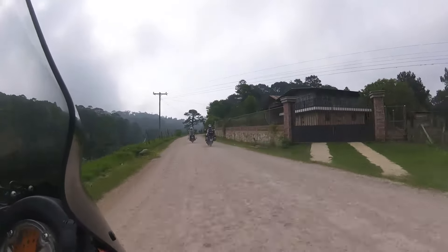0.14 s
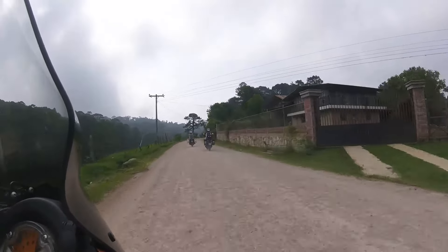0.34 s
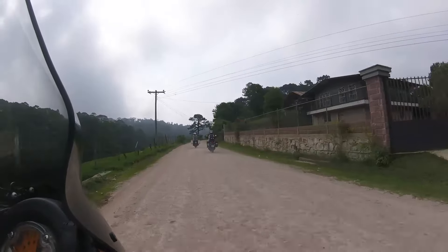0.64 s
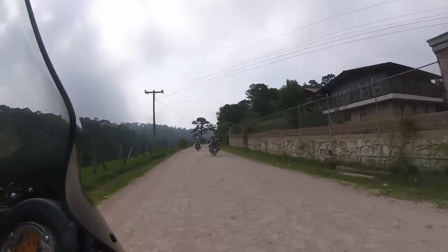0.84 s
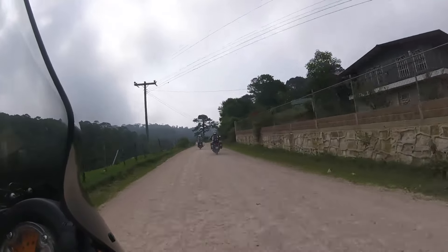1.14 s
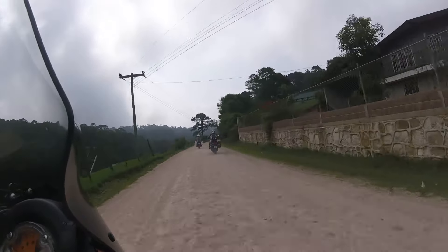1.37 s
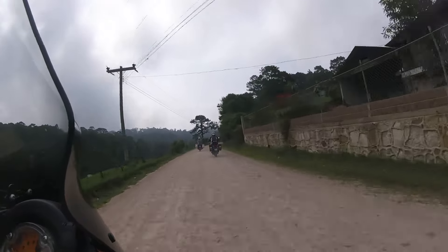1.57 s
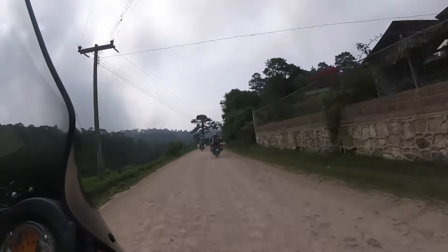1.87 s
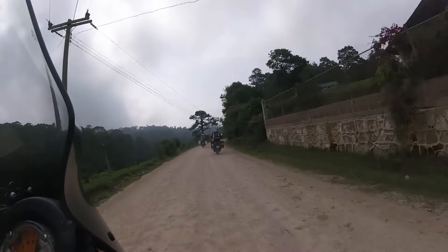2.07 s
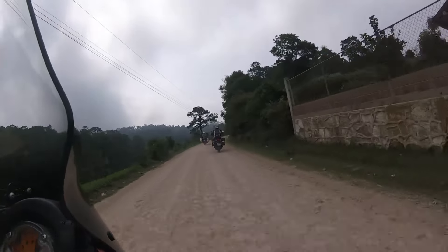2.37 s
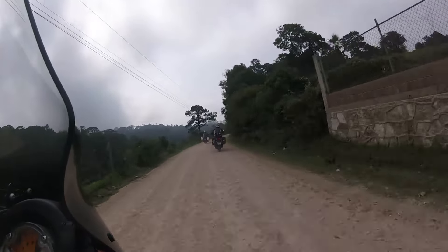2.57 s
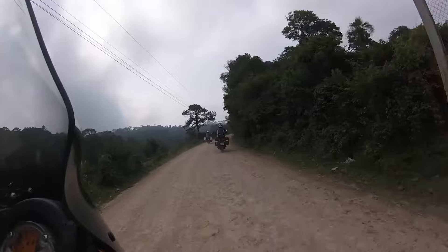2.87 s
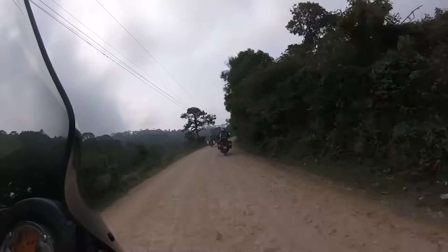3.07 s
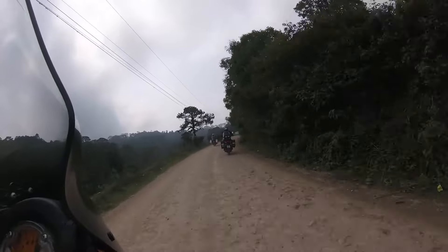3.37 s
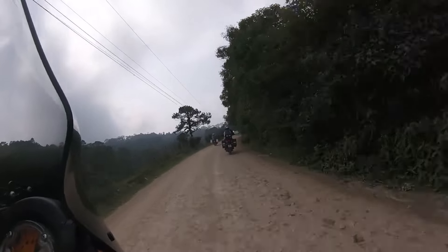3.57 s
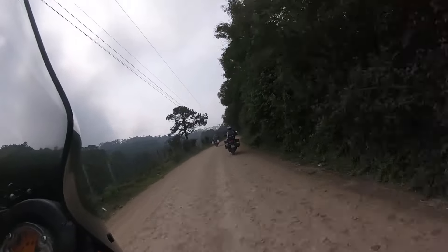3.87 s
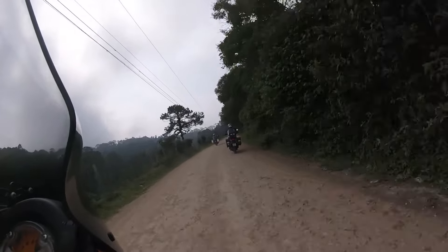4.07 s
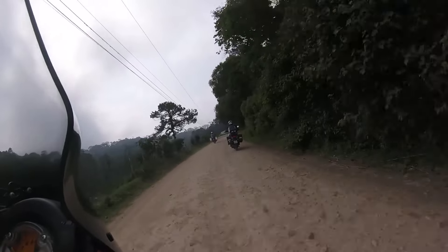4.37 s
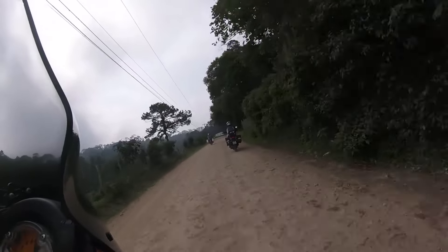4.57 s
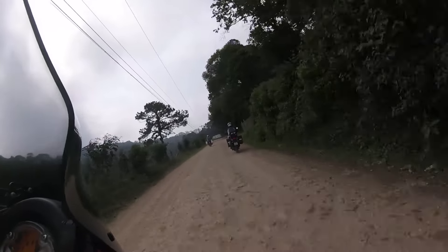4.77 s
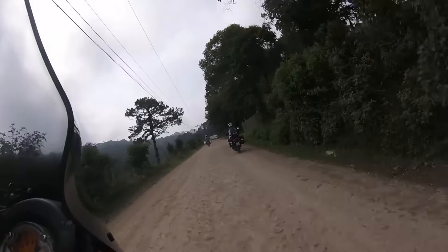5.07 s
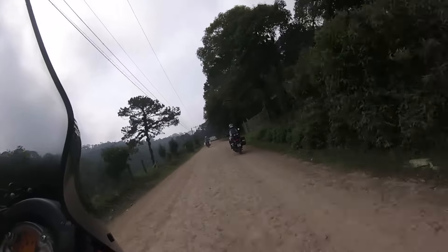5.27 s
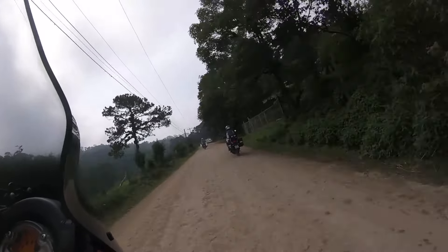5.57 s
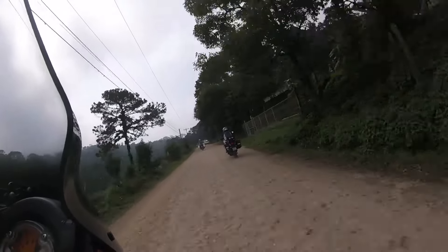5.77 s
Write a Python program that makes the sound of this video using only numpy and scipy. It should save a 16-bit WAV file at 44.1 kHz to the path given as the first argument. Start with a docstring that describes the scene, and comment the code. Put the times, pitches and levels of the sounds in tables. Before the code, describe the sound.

A motorcycle drones steadily along a dirt road, its loose mount clattering dully over low road rumble, with sharp gravel ticks.

```python
"""On a dirt road, riding on a motorcycle: two close microphone ports in a camera case behind the windscreen.
The engine drones in orders of its cycle rate, easing off and pulling again; noise gives road rumble and hiss.
Gusts whistle as chirping edge tones and the gears add a faint, fuzzy mesh tone.
Knocks ring the case in a dull clatter, gravel ticks on the bike, and short faded sines boom in the fairing."""
import sys
import numpy as np
from scipy import signal
from scipy.fft import rfft, irfft
from scipy.io import wavfile
from scipy.ndimage import uniform_filter1d

SR = 44100
rng = np.random.default_rng(int(sys.argv[2]) if len(sys.argv) > 2 else 0)


def unload_audio(sound):
    """Save the sound as a 16-bit wav file, at the path given as the first command line argument."""
    columns = np.transpose(np.atleast_2d(sound))
    # keep every value between -1 and 1, then stretch to whole-number steps
    steps = np.round(np.clip(columns, -1, 1) * 32767)
    wavfile.write(sys.argv[1], SR, steps.astype(np.int16))


N = 261513
TIME = np.arange(N) / SR  # s


def amp(db):
    """Decibels to gain."""
    return 10 ** (np.asarray(db) / 20)


def unit(x):
    """Scales to rms 1."""
    return x / np.sqrt(np.mean(x ** 2) + 1e-20)


def curve(rows, t=TIME):
    """Reads (time, value) rows at the times t, with straight lines between."""
    return np.interp(t, *np.transpose(rows))


def colour(points, hz):
    """Gain of a (frequency, level) table on a log-frequency axis."""
    f, db = np.transpose(points)
    return amp(np.interp(np.log(hz + 1), np.log(f + 1), db))


def wander(rate):
    """Slow random drift of rms 1, mostly below rate in Hz."""
    hz = np.fft.rfftfreq(N, 1 / SR)
    low_pass = 1 / np.sqrt(1 + (hz / rate) ** 6)
    return unit(irfft(rfft(rng.standard_normal(N)) * low_pass, N))


# Difference between the two microphone ports, against their common noise:
# (frequency [Hz], level [dB])
PORT_DIFFERENCE = [(25, -17), (60, -23.5), (130, -22), (260, -27.5), (500, -16), (1000, -12.5),
                   (2000, -21.5), (4500, -37.5), (7000, -40), (9000, -12.5), (12000, 4)]


def noise(points):
    """Coloured noise reaching two close ports: a shared part, and a part of opposite sign in each."""
    hz = np.fft.rfftfreq(N, 1 / SR)
    mid, side = rfft(rng.standard_normal((2, N))) * colour(points, hz)
    side = side * colour(PORT_DIFFERENCE, hz)
    return unit(irfft(np.array([mid + side, mid - side]), N))


def ring(points, size=2048):
    """Causal (minimum-phase) response of a body with this spectrum, peak 1."""
    log_gain = np.log(colour(points, abs(np.fft.fftfreq(size, 1 / SR))))
    spectrum = np.exp(np.conj(signal.hilbert(log_gain)))
    response = np.fft.ifft(spectrum).real[:size // 2]
    return response / abs(response).max()


def add(mix, s, sound):
    """Mixes a sound in at time s."""
    part = mix[max(round(s * SR), 0):][:len(sound)]
    part += sound[:len(part)]


# Engine speed: (time [s], four-stroke cycle rate [cycles/s])
ENGINE_SPEED = [(0.0, 32.64), (0.1, 34.22), (0.5, 33.38), (0.66, 34.88), (0.8, 34.1), (1.4, 34.1),
                (2.0, 35.61), (2.26, 35.12), (2.34, 32.4), (2.5, 33.41), (3.0, 31.96), (3.13, 33.78),
                (3.3, 32.61), (3.8, 33.55), (4.5, 34.08), (5.25, 34.77), (5.93, 36.95)]


def cycles():
    """Running count of engine cycles, the integral of speed, set back an eighth of a cycle."""
    return np.cumsum(curve(ENGINE_SPEED)) / SR - 1 / 8


def stroke():
    """Swings from -1 to 1 once a cycle, highest a tenth of a cycle in."""
    return np.cos(2 * np.pi * (cycles() - .1))


# Throttle: (time [s], opening [0-1])
THROTTLE_OPENING = [(0, 0.59), (.58, 0.44), (.82, 0.95), (2.1, 0.91), (2.32, 0.57), (3.12, 0.71),
                    (3.33, 0.96), (4.9, 0.85), (5.93, 0.95)]
# Strength of the drone: (time [s], relative level [dB])
DRONE_LEVEL = [(0, -19.5), (.12, -15.5), (.2, -17), (.8, -15.5), (1.1, -15.5), (2.1, -16), (2.35, -20),
               (2.55, -17), (3, -20), (3.2, -16.5), (4, -17), (4.35, -14), (4.68, -17), (5.05, -14.5),
               (5.22, -17.5), (5.3, -16.5), (5.8, -16)]
# Engine orders:
# (multiple of the cycle rate, level with throttle shut [relative dB], level with it open [relative dB])
ENGINE_ORDERS = [(2, -19, -12), (3, -5.5, -13), (4, 5, 2), (5, -21, -5), (6, -24.5, -3), (7, -10, -18),
                 (8, -27, -15), (9, -41, -41.5), (10, -37.5, -19.5), (12, -48.5, -52)]


def engine(uneven=0.15, rough=.17, throb_db=0.7, lope=0.083):
    """Uneven burning blurs the orders; throttle sets their balance, and easing off lets the drone lope."""
    boom_db, boom_fall_db, boom_speed = 2.0, 3.5, 33.3  # dB, dB per cycle/s, cycles/s
    turns, opening = cycles(), np.clip(curve(THROTTLE_OPENING), 0, 1)
    pull = np.interp(opening, [.6, .82], [0, 1])
    pipe_lag, pipe_spread = .5, .87 + .48 * pull  # radians
    throb = wander(9)
    drone = np.zeros(N)
    for order, shut_db, open_db in ENGINE_ORDERS:
        k = round(order)
        above_firing = k - 4  # four firings a cycle
        blur = uneven if k == 4 else rough
        burn = 1 + blur * (wander(14) + 1j * wander(14))
        # the exhaust holds higher orders back longer
        delay = above_firing * (pipe_lag + pipe_spread * max(above_firing, 0))
        tone = burn * np.exp(1j * (2 * np.pi * k * turns - delay))
        if k == 2:  # the crank order booms, and fades as the revs rise past its resonance
            revs_past = np.maximum(curve(ENGINE_SPEED) - boom_speed, 0)
            tone = tone * amp(boom_db - boom_fall_db * revs_past)
        order_gain = amp(shut_db + opening * (open_db - shut_db))
        drone -= order_gain * tone.real
    loping = 1 + lope * (1 - pull) * stroke()
    return amp(curve(DRONE_LEVEL) + throb_db * throb) * drone * loping


def shake(times, revs_db=1.5, revs_range=1.7, load_db=1.0):
    """Shaking in dB: it grows with engine speed, levelling off, and a little with load."""
    cruise = 34  # cycles/s
    from_revs = revs_db * (1 - np.exp((cruise - curve(ENGINE_SPEED, times)) / revs_range))
    return from_revs + load_db * (curve(THROTTLE_OPENING, times) - 1)


# Colour of road and wind rumble: (frequency [Hz], relative density [dB])
RUMBLE_COLOUR = [(10, -20), (25, -6), (55, -2), (95, -9), (140, -4), (175, -8), (235, 0), (310, -13.5),
                 (540, -19), (690, -27), (880, -26), (1200, -39), (1800, -48), (6000, -110)]
# Roughness of the road, weighted before use: (time [s], relative level [dB])
ROAD_BUMPS = [(0, 2.5), (1.4, -9.5), (1.6, 2.5), (1.9, 9), (2.3, 7), (2.95, 9.5), (3.15, -2.5), (3.6, 6),
              (4.4, 2.5), (5, -9.5), (5.93, -35.5)]
# Colour of tyre and air hiss through the case: (frequency [Hz], relative density [dB])
HISS_COLOUR = [(700, -10.5), (1500, 7.5), (2300, 9.5), (2900, 3), (3600, -2.5), (4400, -7), (5200, 5.5),
               (6200, 6.5), (6500, 10), (6900, 2.5), (8000, -9), (9500, -14.5), (11300, -37),
               (14000, -63.5)]
# Strength of the hiss: (time [s], relative level [dB])
HISS_STRENGTH = [(0, -58), (1.8, -56), (2.8, -58.5), (4.2, -55), (4.9, -56.5), (5.93, -58.5)]


def road(rumble_db=-25.0, load_db=3, swell_db=2.8, hiss_db=3.5, chop=0.055, pulse=0.35):
    """Rumble pulses with the engine and swells with load and bumps, most in its deep part; firings chop hiss."""
    bump_share, thud_share, shake_share = .12, .26, .3
    spray_s, spray_width_s, spray_db = 1.444, 0.048, 7
    swell = bump_share * curve(ROAD_BUMPS) + load_db * (curve(THROTTLE_OPENING) - 1)
    swell = swell + shake_share * shake(TIME) + swell_db * wander(48)
    rumble = amp(rumble_db + swell) * (1 + pulse * stroke()) * noise(RUMBLE_COLOUR)
    low_pass = signal.butter(2, 100, fs=SR, output="sos")
    deep = signal.sosfiltfilt(low_pass, rumble)
    rumble = rumble - deep + deep * amp(thud_share * curve(ROAD_BUMPS))
    firing = np.cos(8 * np.pi * cycles())
    # a patch of loose sand lifts the hiss
    spray = spray_db * np.exp(-((TIME - spray_s) / spray_width_s) ** 2)
    hiss_gain = amp(curve(HISS_STRENGTH) + spray + hiss_db + wander(30))
    hiss = hiss_gain * (1 + chop * firing) * noise(HISS_COLOUR)
    return rumble + hiss


# Whistling gusts: (start [s], length [s], pitch at the start [Hz], in the middle [Hz],
# at the end [Hz], relative level [dB])
WHISTLING_GUSTS = [(0, 0.049, 3125, 3254, 3015, -58.5), (0.055, .04, 3013, 3100, 2957, -60),
                   (0.113, .035, 2548, 2500, 2820, -54.5), (.172, .025, 2850, 3100, 3270, -59),
                   (.213, 0.06, 3663, 3340, 3700, -54.5), (.265, 0.078, 3476, 3297, 3452, -57),
                   (0.333, .058, 2923, 3180, 3354, -55), (0.403, .035, 3000, 3050, 3280, -57),
                   (0.574, 0.038, 3282, 3495, 3090, -56), (0.624, .04, 3060, 3138, 3148, -55.5),
                   (0.662, 0.11, 3700, 3348, 3400, -56), (0.785, .078, 2955, 3300, 3670, -54.5),
                   (0.852, .048, 3400, 2950, 2437, -53.5), (.938, .065, 3165, 3612, 3520, -54),
                   (.995, 0.068, 3456, 3190, 2952, -53), (1.054, .055, 3230, 3036, 3377, -56),
                   (1.177, .078, 3245, 3076, 3246, -53), (1.303, .027, 2650, 2397, 2185, -51.5),
                   (1.379, .115, 2900, 3468, 3550, -54.5), (1.565, 0.067, 3997, 4043, 3800, -58),
                   (1.618, .075, 3750, 4000, 4300, -55), (1.748, .052, 4180, 3760, 3763, -58),
                   (1.8, .068, 3733, 4020, 3420, -56.5), (1.918, 0.028, 3650, 3846, 4114, -56.5),
                   (2.012, .04, 4100, 3780, 4160, -56.5), (2.05, .08, 3850, 3900, 3950, -55.5),
                   (2.177, 0.071, 3845, 3650, 3590, -54.5), (2.23, 0.11, 3850, 3724, 3950, -54.5),
                   (2.321, .075, 3650, 3600, 3437, -55.5), (2.418, 0.028, 2887, 2600, 2487, -55),
                   (2.471, .085, 2816, 3025, 3600, -57), (2.567, .082, 3320, 3250, 3550, -56.5),
                   (2.705, 0.024, 3260, 3000, 2683, -55), (2.788, 0.07, 2845, 2796, 2817, -62),
                   (2.893, 0.024, 2764, 2650, 2500, -57), (2.956, .065, 2738, 2900, 2758, -62),
                   (3.073, .04, 2700, 2650, 2520, -59), (4.138, 0.046, 2547, 2786, 3303, -59.5),
                   (4.29, .08, 3146, 3300, 3344, -54.5), (4.391, 0.038, 3150, 2850, 2513, -59),
                   (4.455, .035, 3036, 2750, 2470, -59), (4.493, 0.04, 2390, 2750, 2953, -56.5),
                   (4.755, .045, 2836, 3050, 3393, -54), (4.905, .05, 3006, 3350, 3455, -57.5),
                   (4.963, .057, 3150, 3286, 3480, -56.5), (5.242, 0.062, 3036, 3247, 3260, -57.5),
                   (5.295, .03, 3200, 3450, 3350, -64), (5.456, 0.052, 2840, 3037, 3404, -59),
                   (5.767, 0.041, 3225, 3300, 3200, -61)]


def whistle(level_db=-0.7, waver_db=2.5, lull_swell_db=3):
    """An edge tone whose pitch swoops with the air speed of each short gust and trembles with turbulence."""
    lull_hz, lull_db = 2650, -75  # between gusts; the level is relative
    pitch = np.full(N, float(lull_hz))
    level = amp(lull_db + lull_swell_db * wander(8))
    for start, length, *path_hz, db in WHISTLING_GUSTS:
        gust = (TIME >= start) & (TIME < start + length)
        along = (TIME[gust] - start) / length
        swell = signal.windows.tukey(len(along), .3)
        pitch[gust] = np.polyval(np.polyfit([0, .5, 1], path_hz, 2), along)
        level[gust] += swell * (amp(db) - level[gust])
    pitch = uniform_filter1d(pitch, round(.004 * SR))  # pitch steps become short glides
    # strong, fast air locks into a purer tone; weak gusts only rasp
    breathy = np.interp(pitch, [2900, 3700], [.8, .45])
    breathy = breathy * np.interp(level, amp([-58, -53]), [1, .5])
    flutter = 90 * wander(75)  # Hz
    turn = np.exp(2j * np.pi * np.cumsum(pitch + flutter) / SR)
    rasp = 1 + breathy * (wander(340) + 1j * wander(340))
    tone = (turn * rasp).real / np.sqrt(1 + 2 * breathy ** 2)
    return amp(level_db) * level * unit(tone * amp(waver_db * wander(82)))


def gears(level_db=-62, teeth=70.3, blur=.35):
    """A faint, fuzzy mesh tone tied to the road speed, which follows the engine smoothly."""
    road_speed = uniform_filter1d(curve(ENGINE_SPEED), SR // 2)
    turn = np.exp(2j * np.pi * teeth * np.cumsum(road_speed) / SR)  # teeth meeting per engine cycle
    # (time [s], relative level [dB])
    level = curve([(0, -4.5), (2.2, -6), (2.8, -4), (3.4, -5.5), (4.3, -3), (5.93, -11.5)])
    fuzz = 1 + blur * (wander(35) + 1j * wander(35))
    return amp(level_db + level) * unit((turn * fuzz).real)


# Clear knocks of the camera mount: (time [s], relative level [dB])
MOUNT_KNOCKS = [(0.0532, -23.5), (0.0625, -23.5), (0.0925, -18.5), (0.1511, -16.5), (0.159, -25),
                (0.2099, -21), (0.2978, -18.0), (0.4178, -21.5), (0.4318, -25), (0.4776, -22),
                (0.506, -19.5), (0.566, -18), (0.669, -20), (0.697, -22), (0.711, -19.5), (0.7691, -20),
                (0.798, -17), (0.8574, -19), (0.9507, -26), (0.9747, -21.5), (1.0033, -19), (1.04, -25),
                (1.0613, -18), (1.0916, -20), (1.1503, -18), (1.1863, -21.0), (1.216, -21.5), (1.2389, -22),
                (1.327, -18.5), (1.4144, -19.5), (1.479, -19), (1.5018, -16.5), (1.5596, -20.5),
                (1.6027, -21), (1.6369, -24.5), (1.646, -17.5), (1.7037, -15.5), (1.7329, -20.5),
                (1.796, -22), (1.832, -19.5), (1.859, -19.5), (1.904, -19), (1.9162, -28), (1.9601, -22),
                (2.0173, -18), (2.049, -18.5), (2.0722, -19), (2.1009, -19), (2.1296, -20.5),
                (2.1629, -20.0), (2.187, -18), (2.2425, -18), (2.2987, -21), (2.329, -23.5), (2.3825, -22),
                (2.5116, -19.5), (2.541, -21), (2.5647, -22), (2.5945, -21.0), (2.7468, -20.5),
                (2.857, -24), (2.869, -26), (3.0257, -26.5), (3.1829, -19.5), (3.1991, -25.5),
                (3.2881, -22.5), (3.3574, -21), (3.3658, -22), (3.577, -21.5), (3.6981, -18), (3.7731, -22),
                (3.8182, -24.5), (3.8484, -19.5), (3.9364, -18.5), (4.0106, -19.5), (4.0548, -22),
                (4.1162, -24), (4.129, -22.5), (4.2696, -21), (4.2765, -20.5), (4.321, -16.5), (4.335, -19),
                (4.351, -20), (4.4238, -17.5), (4.482, -23), (4.5278, -21), (4.557, -17), (4.5867, -21.5),
                (4.6154, -24.5), (4.6721, -22.5), (4.7024, -20), (4.717, -22), (4.732, -20), (4.7659, -23),
                (4.775, -17), (4.8183, -22), (4.8489, -19.5), (4.878, -21), (4.9223, -19.5), (4.9576, -22),
                (4.981, -22), (4.9942, -20), (5.0137, -20), (5.023, -17.5), (5.0587, -25), (5.0719, -23),
                (5.0817, -20), (5.0942, -20.5), (5.1082, -14.5), (5.145, -19), (5.1675, -21),
                (5.1817, -19.5), (5.1965, -20), (5.2542, -18.5), (5.2828, -20.5), (5.3106, -19.5),
                (5.3386, -26), (5.3685, -17.5), (5.4017, -21.5), (5.4247, -15.5), (5.4523, -22.5),
                (5.509, -23), (5.5376, -19), (5.5949, -17.5), (5.6073, -24), (5.6213, -24), (5.654, -20.5),
                (5.6627, -21), (5.6772, -22), (5.7042, -19), (5.7324, -19), (5.7379, -19.5), (5.746, -25),
                (5.76, -22.5), (5.765, -20), (5.7917, -21), (5.8142, -17.5), (5.841, -18.5), (5.869, -20),
                (5.896, -18.5), (5.9237, -17.5)]
# The four jolts of a cycle: (place in the cycle [0-1], greatest relative strength [dB], relative scatter [dB])
CYCLE_JOLTS = [(0, -2.5, 7), (0.209, -6, 7.5), (0.469, 3, 9), (0.709, -1.5, 9.5)]
# Ring of the camera case when knocked: (frequency [Hz], relative level [dB])
CASE_RING = [(30, -28), (130, 3), (280, 4), (480, 3.5), (660, -6), (820, -3.5), (980, -7), (1130, -14),
             (1330, -15.5), (1750, -26.5), (2250, -36), (4000, -41), (9000, -71)]


def clatter(loud_db=6.5, light_db=-16, light_limit_db=-22, contact_s=.00008, bounce_s=0.0022,
            chatter=0.2, steadying=0.96, hardening=0.56, revs_hardening=0.56, seesaw_db=2):
    """Firings jolt the loose mount against its stop: dull knocks, small bounces and chatter ring the case."""
    turns = cycles()
    place, strength_db, scatter_db = np.transpose(CYCLE_JOLTS)
    whole = np.arange(1, int(turns[-1]))[:, None]
    times = np.interp(whole + place, turns, TIME)
    slip, force = rng.standard_normal((2, *times.shape))
    times = times + .0006 * slip
    shaking = shake(times)
    # harder shaking is more even
    scatter = scatter_db * amp(-steadying * shaking) * (np.minimum(force, 1) - 1)
    sizes = light_db + shaking + strength_db + scatter
    # the mount often hits hard only every other cycle
    seesaw = np.tanh(2 * np.interp(times, TIME, wander(3)))
    sizes += seesaw_db * seesaw * (-1) ** whole
    # between the clear knocks the ticking stays light
    sizes = np.minimum(sizes, light_limit_db + .5 * shaking)
    free = abs(times[..., None] - np.array(MOUNT_KNOCKS)[:, 0]).min(-1) > .005
    blows = [(s, db + loud_db) for s, db in MOUNT_KNOCKS]
    blows += list(zip(times[free], sizes[free]))
    t, push = np.arange(-56, 57) / SR, np.zeros(N)
    variations = rng.uniform(-1.3, 0.95, (len(blows), 3))
    for (s, db), (soft, late, back) in zip(blows, variations):
        # light, slow blows touch for longer and sound duller
        hardness_db = hardening * (db - light_db) + revs_hardening * shake(s)
        width = contact_s * 2 ** (soft / 2) * amp(-hardness_db)
        contact = np.exp(-.5 * (t / width) ** 2)
        contact *= amp(db) / contact.sum()
        add(push, s + t[0], contact)
        for delay, size in zip(rng.uniform(.002, .011, 3), rng.uniform(-1, 1, 3)):
            add(push, s + t[0] + delay, chatter * size * contact)
        bounce_delay = bounce_s * 2 ** (late / 2)
        add(push, s + t[0] + bounce_delay, 0.39 * back ** 2 * contact)
    return -signal.oaconvolve(push, ring(CASE_RING))[:N]


# Larger gravel strikes, plus one dark row at 3.183 s that gives body to a hard jolt of the bike: (time [s],
# level [dB], brightness [dB per octave])
GRAVEL_STRIKES = [(.15, -40, 3), (.332, -42, 2), (.855, -38, 4), (1.221, -37, 2), (1.325, -40, 1),
                  (1.489, -39, 1), (1.5, -37, 4), (1.525, -39, 3), (1.65, -33, 3), (1.6585, -28, 5),
                  (1.702, -34, 1), (1.8305, -30, 2), (2.601, -41, 3), (3.131, -42, 4), (3.1805, -41, 6),
                  (3.183, -24, -6), (3.5, -39, 5), (3.876, -37, 2), (4.03, -25.5, 0), (4.349, -38, 2),
                  (4.499, -37, 4), (4.507, -32, 2), (4.555, -37, -2), (4.794, -37, 4), (5.021, -38, 2),
                  (5.106, -40, 1), (5.423, -37, 2), (5.499, -32, 4), (5.66, -36, 1), (5.705, -39, 2),
                  (5.815, -39, 1)]
# Colour of a gravel strike: (frequency [Hz], relative level [dB])
STRIKE_RING = [(500, -14), (1500, 8), (2400, 8), (4400, 0), (5600, 2), (6200, 5), (6500, 12), (6900, 3),
               (7600, -3), (9000, -7), (10200, -18), (11300, -24), (11900, -20), (13500, -40)]


def gravel(skid_s=0.0013, grit_db=-52, grit_per_s=30, grit_spread_db=3):
    """Stones flung against the bike, each a tick and a tiny noisy skid, over a sprinkle of fine grit; one dark
    strike adds body to a hard jolt."""
    hits = rng.random(N) < grit_per_s / SR
    grit = hits * amp(grit_db + grit_spread_db * np.minimum(rng.exponential(1, N), 3))
    out = signal.oaconvolve(grit, ring(STRIKE_RING))[:N]
    t = np.arange(800) / SR
    for s, db, brightness in GRAVEL_STRIKES:
        skid = .1 * rng.standard_normal(len(t)) * np.exp(-t / skid_s)
        crack = (t == 0) + skid
        body = ring([(hz, level + brightness * np.log2(hz)) for hz, level in STRIKE_RING])
        add(out, s, amp(db) * np.convolve(crack, body))
    return out


# Brief booms and whines of the fairing: (start [s], length [s], pitch [Hz], level [dB])
FAIRING_MOANS = [(.78, 0.066, 220.4, -14), (1.575, 0.094, 900, -38.5), (2, 0.089, 231.6, -21.5),
                 (2.81, .13, 225.3, -17), (3.464, 0.098, 884, -37), (4.95, .12, 233.3, -18.5)]


def fairing():
    """Now and then a panel booms or sings briefly: a sine that swells and fades."""
    out = np.zeros(N)
    for s, length, hz, db in FAIRING_MOANS:
        t = np.arange(0, length, 1 / SR)
        add(out, s, amp(db) * np.hanning(len(t)) * np.sin(2 * np.pi * hz * t))
    return out


def scene():
    """Everything is close to the two ports, so it is nearly mono; only road noise differs between them."""
    return engine() + road() + whistle() + gears() + clatter() + gravel() + fairing()


def record(dry, ceiling=1.0, edge_hz=15600):
    """The loudest peaks are rounded off and the ends softened; then the treble is cut above the edge."""
    rounded = dry / (1 + (dry / ceiling) ** 8) ** (1 / 8)
    rounded = rounded * signal.windows.tukey(N, .001)
    low_pass = signal.butter(12, edge_hz, fs=SR, output="sos")
    return signal.sosfiltfilt(low_pass, rounded)


dry = scene()
out = record(dry)
unload_audio(out)
```